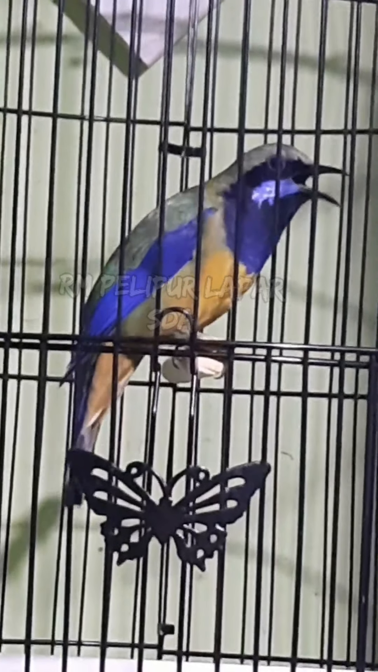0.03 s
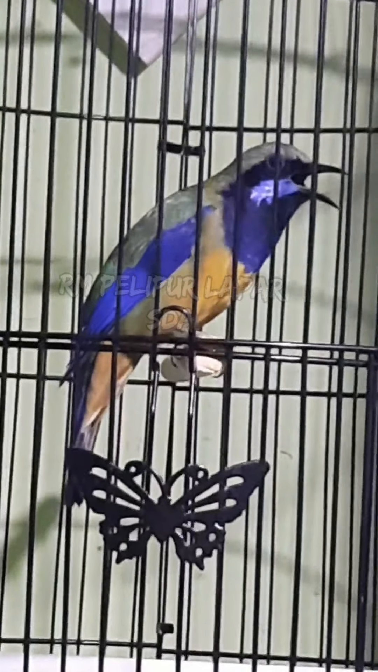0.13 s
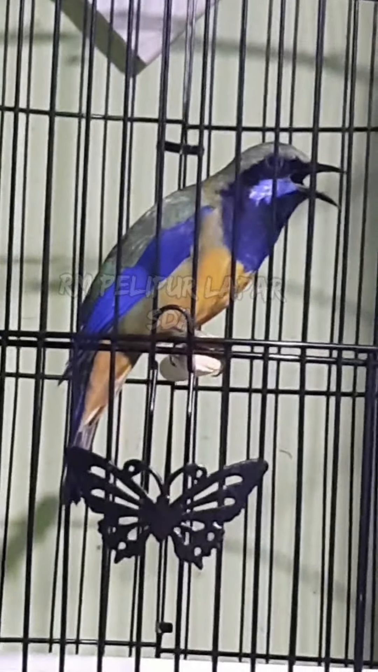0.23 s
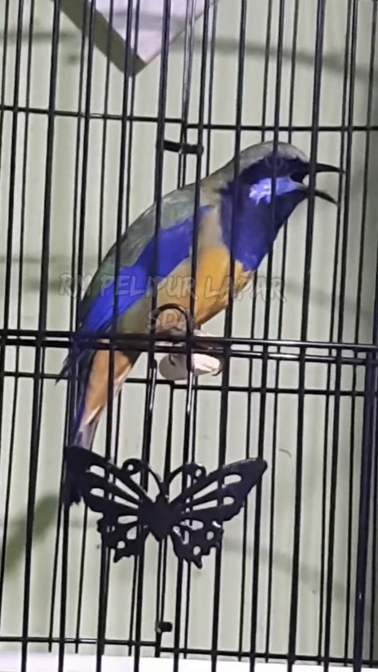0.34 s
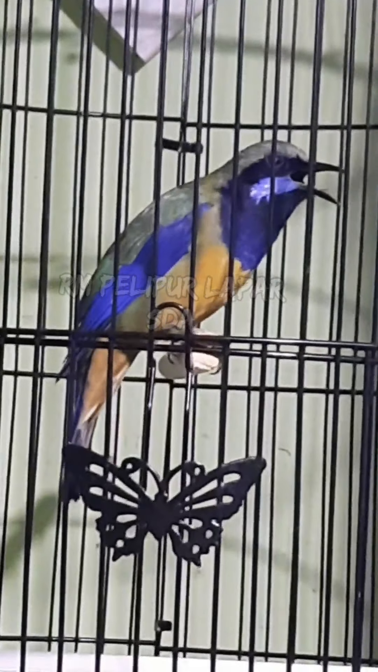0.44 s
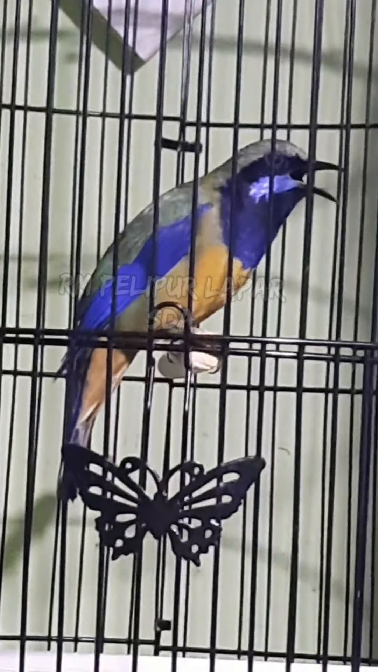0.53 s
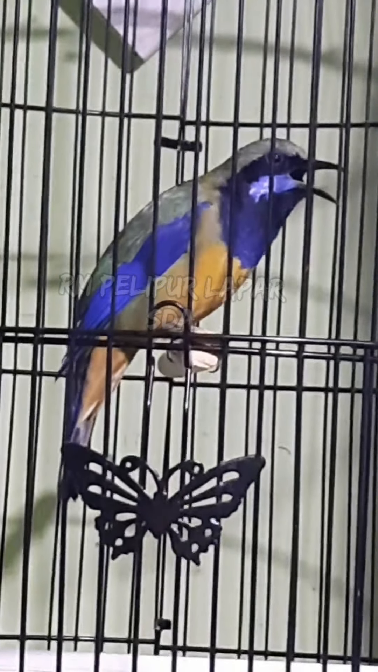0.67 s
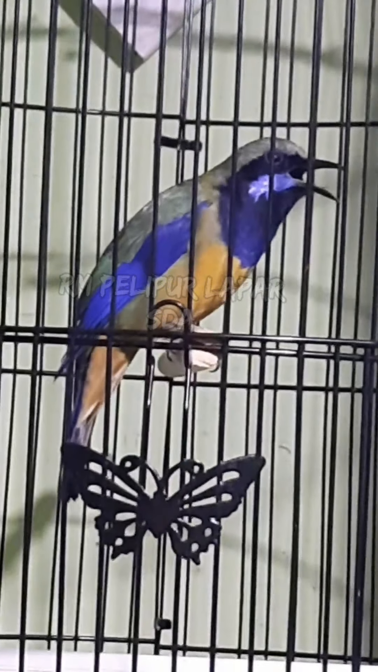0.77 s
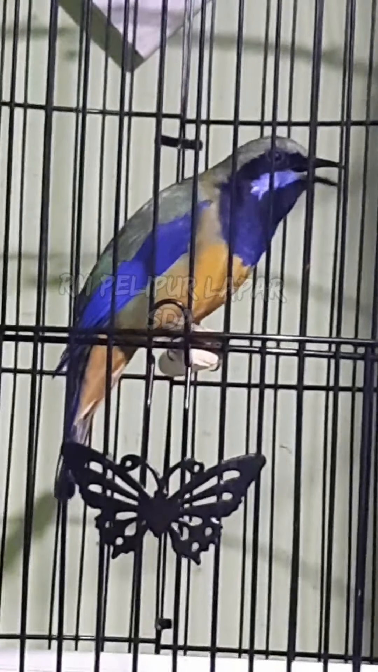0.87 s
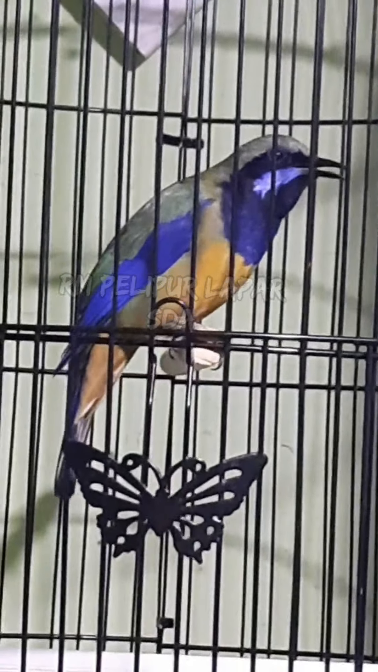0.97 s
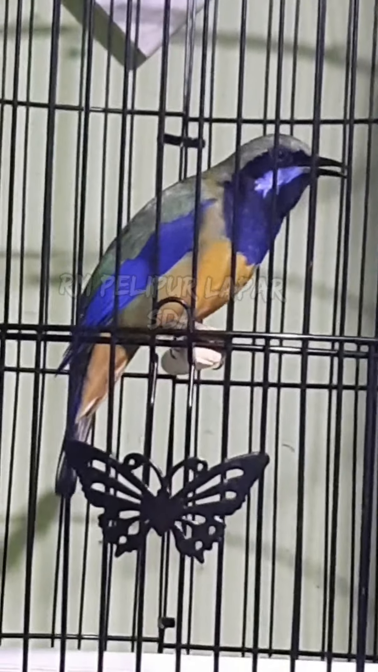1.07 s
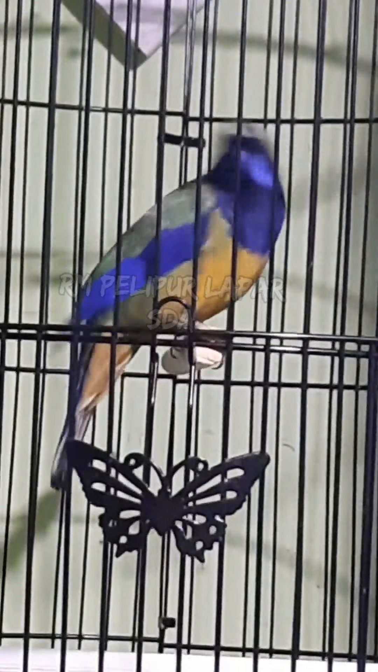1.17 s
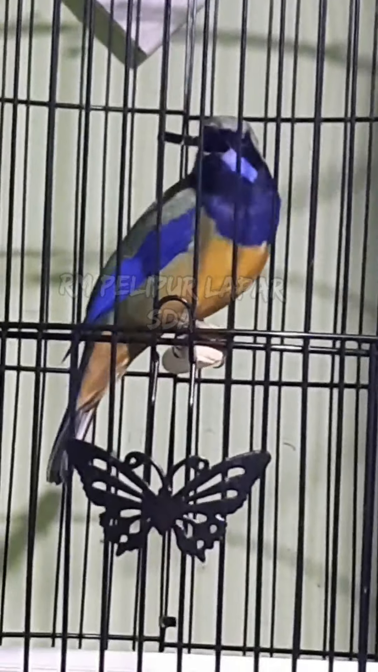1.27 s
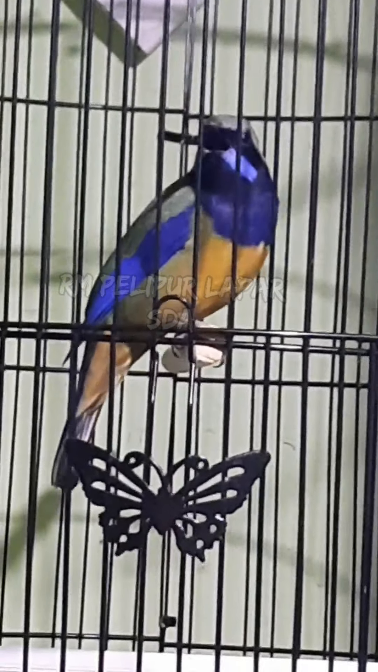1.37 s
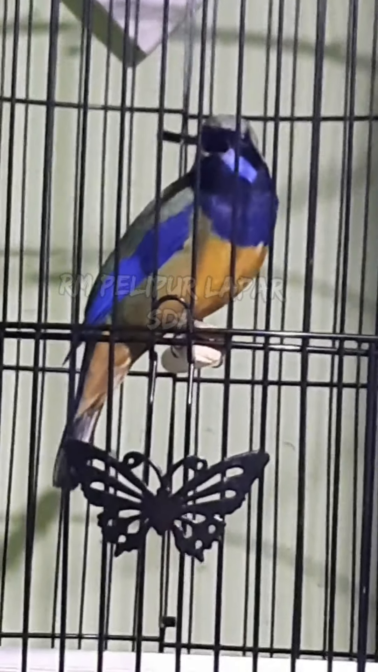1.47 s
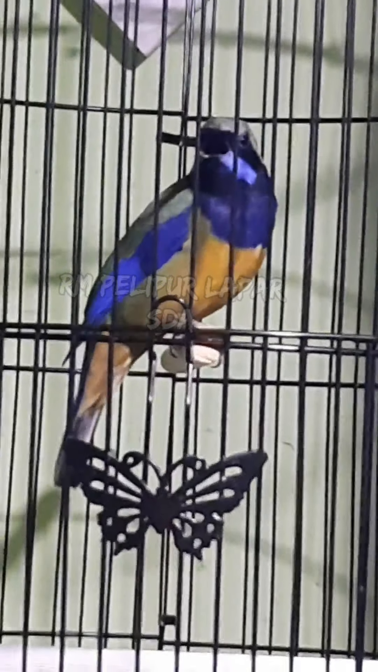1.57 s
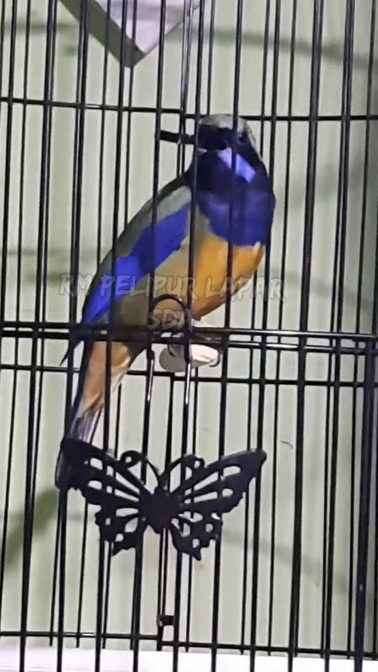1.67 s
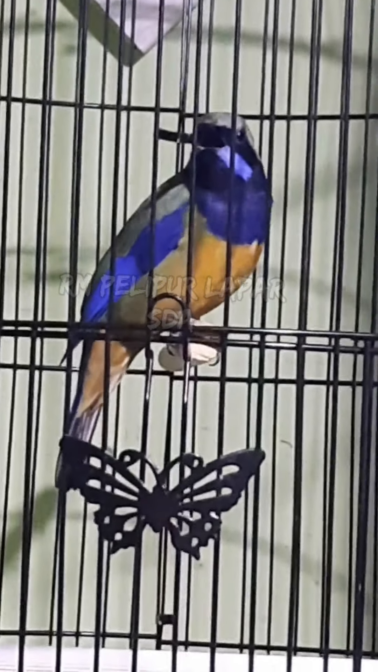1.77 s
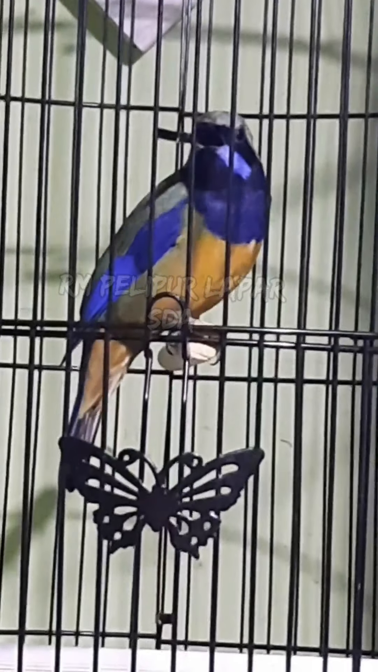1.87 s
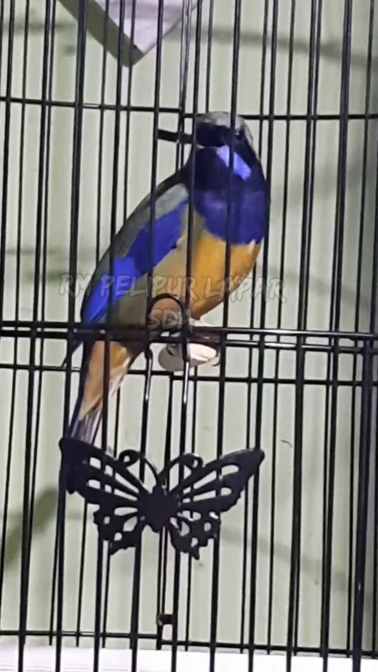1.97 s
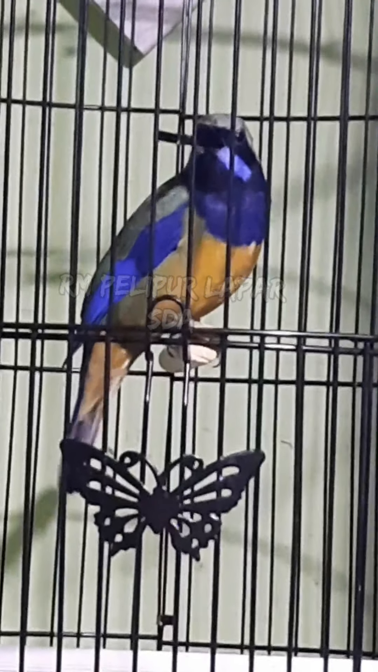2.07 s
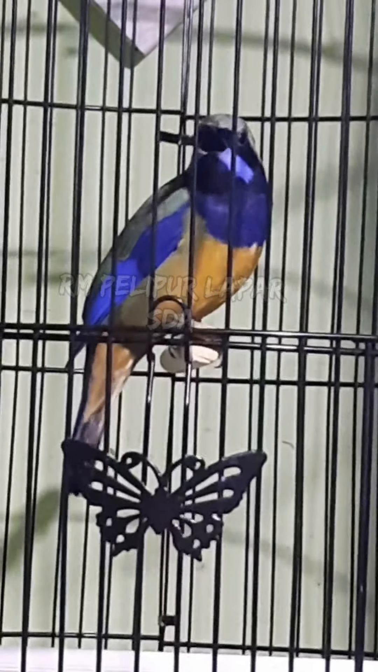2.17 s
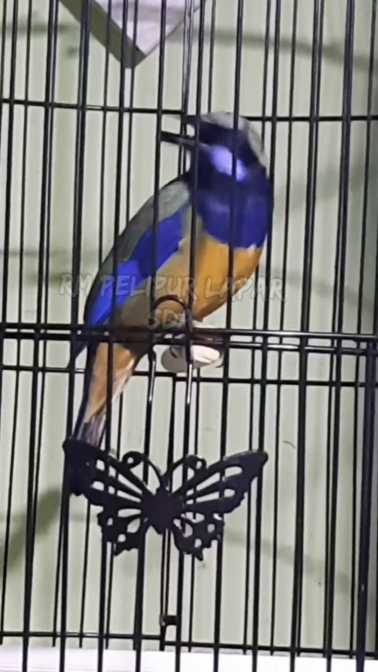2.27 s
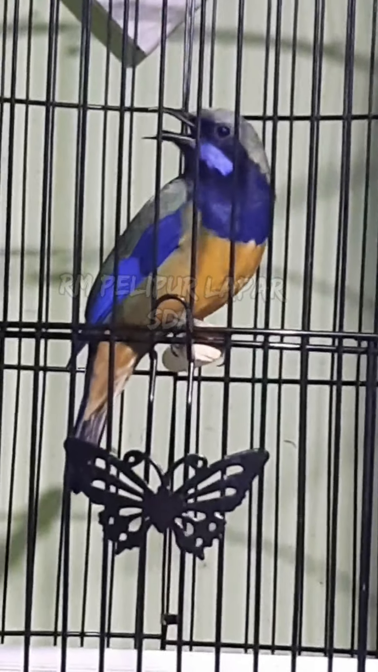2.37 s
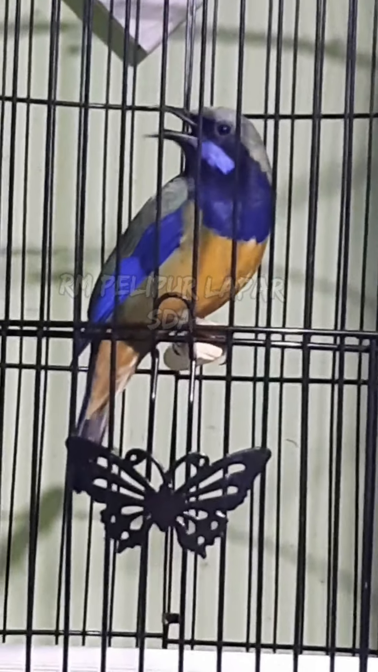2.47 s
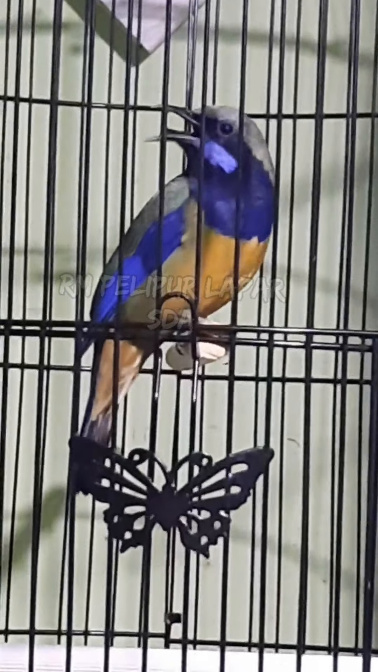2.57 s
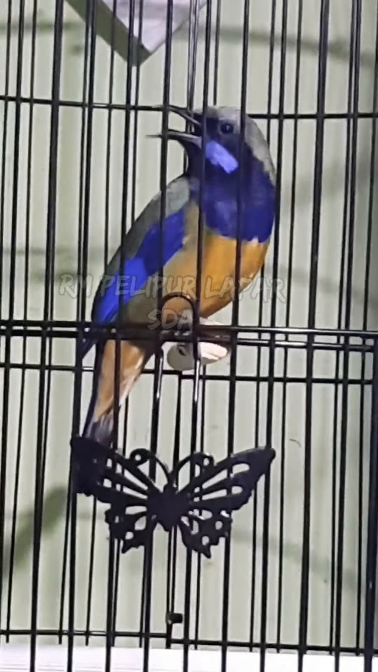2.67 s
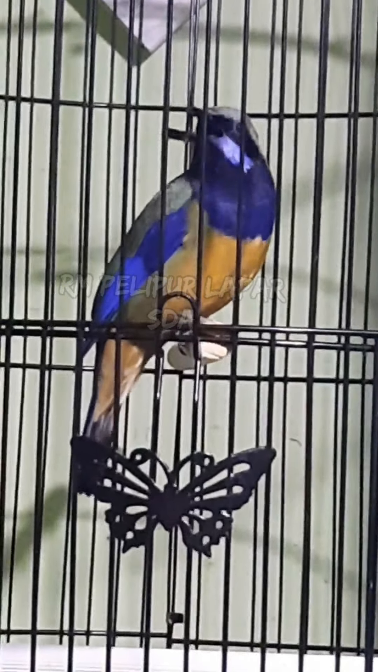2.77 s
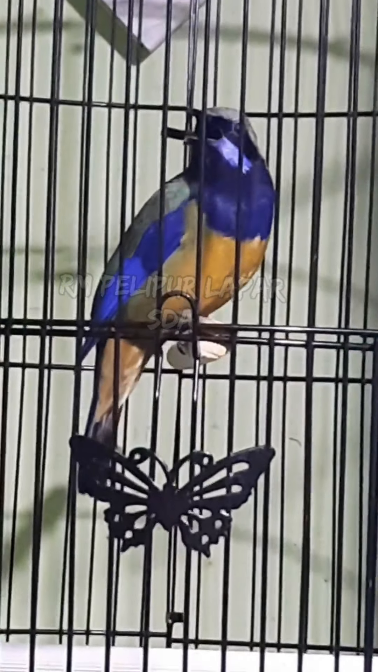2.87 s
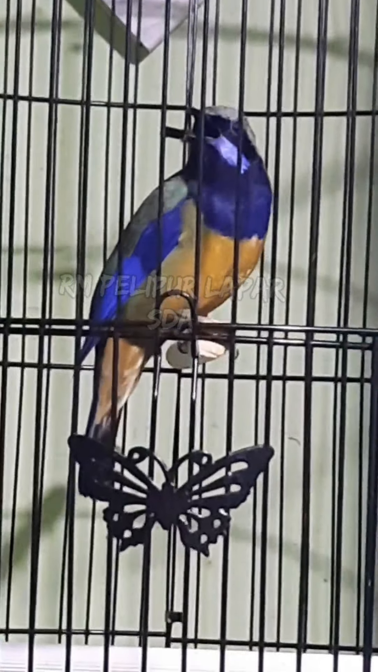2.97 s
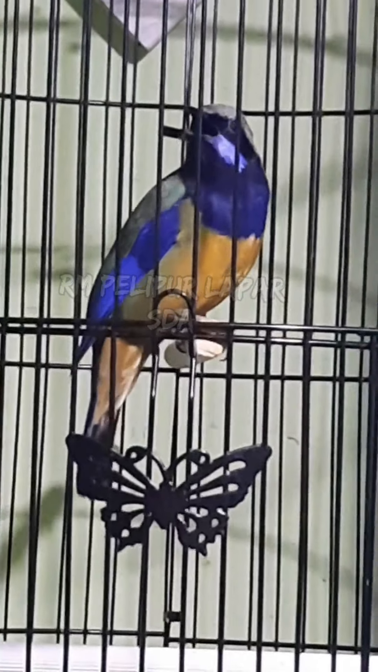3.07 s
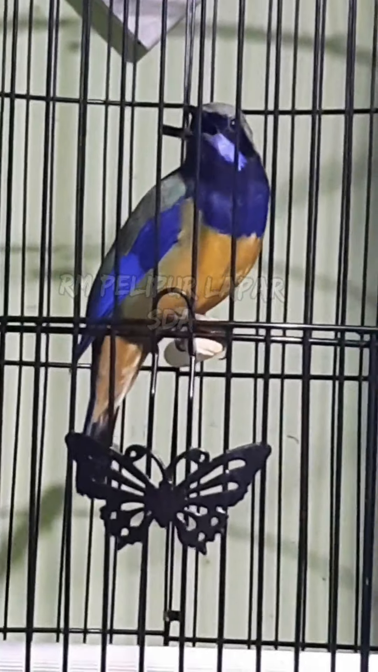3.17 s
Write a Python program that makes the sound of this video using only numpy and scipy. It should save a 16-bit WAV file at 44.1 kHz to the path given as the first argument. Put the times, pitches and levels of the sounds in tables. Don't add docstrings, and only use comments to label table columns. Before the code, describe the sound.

A caged songbird rattles off fast hard trills, then a long loud roll of down-sliding chirps, over faint street hum and hollow knocks.

```python
import sys
import numpy as np
from scipy import signal
from scipy.io import wavfile
from scipy.ndimage import map_coordinates

SR = 44100
rng = np.random.default_rng(int(sys.argv[2]) if len(sys.argv) > 2 else 0)


def put_to_file(sound):
    columns = np.atleast_2d(sound).T
    safe = np.clip(columns, -1, 1)
    whole_steps = np.round(safe * 32767)
    wavfile.write(sys.argv[1], SR, whole_steps.astype(np.int16))


def amplitude_ratio(level_db):
    exponent = np.asarray(level_db, float) / 20
    return 10 ** exponent


N = 344862


def at_hz(points, hz):
    points_hz, values = np.transpose(points)
    return np.interp(np.log(hz), np.log(points_hz), values)


def rms_one(x):
    return x / np.sqrt(np.mean(x ** 2) + 1e-20)


def drift(rate_hz, step=1):
    r = np.exp(-2 * np.pi * rate_hz * step / SR)
    slow = signal.lfilter([1], [1, -2 * r, r * r], rng.standard_normal(N // step + 2002))[2000:]
    return np.interp(np.arange(N) / step, np.arange(len(slow)), rms_one(slow))


def band(low_hz, high_hz, x):
    return signal.sosfilt(signal.butter(2, [low_hz, high_hz], "band", fs=SR, output="sos"), x)


# t/s (pitch tops out), level/dB
FIRST_ROLL = [(0.011, -20), (0.079, -18), (0.136, -15), (0.196, -17.5), (.253, -17.5), (0.312, -19.5),
              (.381, -17), (.438, -16.5), (0.5, -19), (0.557, -21.5), (0.617, -18), (0.677, -14.5),
              (0.742, -19), (0.795, -19)]
# t/s, level/dB
SECOND_ROLL = [(1.243, -13.5), (1.295, -9.5), (1.36, -12.5), (1.426, -13), (1.486, -12.5), (1.548, -14),
               (1.599, -13.5), (1.675, -14.9), (1.736, -14), (1.802, -22.5), (1.868, -14.5), (1.925, -14),
               (1.997, -16.5), (2.091, -12)]
# t/s, level/dB
LAST_ROLL = [(6.959, -19.5), (7.007, -15), (7.064, -18), (7.128, -18), (7.189, -16.5), (7.25, -17.5),
             (7.311, -17.5), (7.366, -16), (7.429, -17), (7.507, -18), (7.567, -17.5), (7.634, -17.5),
             (7.693, -18), (7.761, -19.5), (7.821, -17)]
# first f/Hz, last f/Hz, hold/s, first overtones/dB, last overtones/dB
ROLL_VOICE = [
    (4750, 4710, 0.016, -33, -47),
    (5046, 4880, 0.013, -18.5, -29),
    (4777, 4720, 0.02, -31, -39),
]


def fast_notes():
    pitch_scatter, hold_scatter, over_scatter_db = .012, .25, 2.5
    rows = []
    for roll, voice in zip((FIRST_ROLL, SECOND_ROLL, LAST_ROLL), ROLL_VOICE):
        first_hz, last_hz, hold_s, first_db, last_db = voice
        chances = rng.standard_normal((len(roll), 3))
        for along, (s, level_db), chance in zip(np.linspace(0, 1, len(roll)), roll, chances):
            top_hz = (first_hz + (last_hz - first_hz) * along) * (1 + pitch_scatter * chance[0])
            note_hold_s = hold_s * np.exp(hold_scatter * chance[1])
            over_db = first_db + (last_db - first_db) * along + over_scatter_db * chance[2]
            rows.append((s, level_db, top_hz, note_hold_s, over_db))
    return rows


# t/s (pitch tops out), level/dB, top f/Hz, end f/Hz
SLOWING = [(2.168, -7, 5330, 4680), (2.252, -9, 5400, 4980), (2.327, -12, 5700, 4750),
           (2.4, -13.5, 5890, 4430), (2.484, -9, 5720, 4880), (2.568, -9.5, 5640, 4660),
           (2.637, -6.5, 5500, 4830), (2.716, -14, 5510, 4370), (2.788, -10, 5630, 4370),
           (2.872, -11.5, 5440, 4360), (2.949, -12, 5370, 4640), (3.039, -9, 5620, 4510),
           (3.133, -10, 5570, 4570), (3.227, -10, 5480, 4630), (3.328, -9, 5480, 4530),
           (3.424, -8.5, 5640, 4630), (3.525, -8.5, 5440, 4680), (3.626, -10, 5460, 4530),
           (3.721, -10, 5620, 4590), (3.808, -10, 5510, 4710), (3.908, -9.5, 5710, 4680),
           (4.01, -9, 5380, 4390), (4.113, -9, 5450, 4670), (4.209, -8.5, 5580, 4590)]
# t/s, level/dB, top f/Hz, end f/Hz
STEADY = [(4.313, -9, 5700, 4650), (4.415, -10.5, 5670, 4790), (4.521, -9, 5520, 4580),
          (4.629, -8.5, 5450, 4460), (4.73, -9, 5550, 4570), (4.834, -7, 5300, 4725),
          (4.94, -10.5, 5580, 4490), (5.049, -8, 5350, 4660), (5.146, -8, 5450, 4650),
          (5.251, -8.5, 5540, 4720), (5.357, -9.5, 5740, 4760), (5.461, -7.5, 5630, 4820),
          (5.569, -7.5, 5660, 4770), (5.704, -7, 5640, 4765), (5.806, -11, 5740, 4750),
          (5.915, -10.5, 5600, 4670), (6.024, -8.5, 5570, 4606), (6.133, -10, 5410, 4590),
          (6.238, -10.5, 5380, 4410), (6.36, -10.5, 5370, 4510), (6.456, -9.5, 5350, 4540),
          (6.56, -10.5, 5330, 4660), (6.684, -10, 5690, 4670), (6.808, -11.5, 5710, 4770)]


def slow_notes():
    s, level_db, top_hz, end_hz = np.transpose(list(SLOWING) + list(STEADY))
    slide_s = np.minimum(.28 * np.diff(s, append=N / SR), .031)
    over_db = -10.5 + 13.5 * (top_hz - 5550) / 1000 - 0.53 * (level_db + 10)
    return list(zip(s, level_db, top_hz, end_hz, slide_s, over_db))


# f/Hz, gain/dB
THROAT = [(900, -107), (2000, 0), (3000, -0.5), (4200, 9.5), (5000, 1), (6300, 1), (7200, -19),
          (8200, -20.5), (10000, -7.5), (12000, -18), (15000, -19)]


def note(wobble, air, start_hz, top_hz, end_hz, rise_s, hold_s, over_db, bend, ease, onset_db, swell_db,
         buzz_db, thin_db, third_db, fade_s):
    t = np.arange(len(wobble)) / SR - rise_s
    climb = np.clip(1 + t / rise_s, 0, 1)
    slide = np.clip(t / hold_s, 0, 1.2)
    ragged = .035 * np.sign(1 - climb) * np.tanh(wobble / wobble.std())
    hz = start_hz + (top_hz - start_hz) * climb ** bend + (end_hz - top_hz) * slide ** 0.99
    hz = hz * (1 + wobble + ragged)
    phase = 2 * np.pi * np.cumsum(hz) / SR

    swell = amplitude_ratio(swell_db * np.sin(np.pi * np.minimum(slide, 1)))
    locked = climb ** 8
    tiring_db = -5 * slide ** 2
    breath = np.clip(climb / ease, 0, 1) ** 1.7 * amplitude_ratio(onset_db * (1 - locked) + tiring_db) * swell
    breath *= np.exp(-(np.maximum(t - hold_s, 0) / fade_s) ** 2)

    slack = np.clip((1 - climb) / 0.28, 0, 1)
    hiss = air * (.25 + slack) * (1 + np.cos(phase))
    tone = amplitude_ratio(at_hz(THROAT, hz)) * np.sin(phase) + hiss
    for k in range(2, 7):
        buzz = slack * amplitude_ratio(buzz_db + thin_db * (k - 4.5) + at_hz(THROAT, k * hz))
        edge = locked * swell * amplitude_ratio(over_db + third_db * (k - 3) - 2.0 * slide ** 2)
        below_limit = k * hz < .45 * SR
        tone += (buzz + edge) * below_limit * np.sin(k * phase)
    return breath * tone


# t/s (pitch tops out), level/dB, top f/Hz, end f/Hz, slide/s, overtones/dB
WHISTLE = [
    (1.795, -35, 5600, 5750, .045, -20),
]


def bird():
    size = SR // 12
    out = np.zeros((3, N + SR))
    wobble, flutter = drift(900), amplitude_ratio(1.2 * drift(200))
    notes = fast_notes() + slow_notes() + list(WHISTLE)
    chance = rng.standard_normal((len(notes), 4))
    poses = np.eye(3)[0] + 0.347 * chance[:, :3] * [0, 1, 1]
    for pose, push, row in zip(poses, chance[:, 3], notes):
        s, level_db, top_hz, *rest = row
        fast = len(rest) == 2
        rise_s = .021 if fast else .013
        at = int((s - rise_s) * SR)
        shake = np.resize(wobble[max(at, 0):][:size], size)
        air = np.diff(rng.standard_normal(size + 1))
        if fast:
            hold_s, over_db = rest
            rasp = amplitude_ratio(-36) * band(2200, 7200, air)
            sound = amplitude_ratio(4.5) * note(
                0.034 * shake, rasp, 1250, top_hz, .98 * top_hz, rise_s, 0.5 * hold_s, over_db - 4.0,
                bend=1.4, ease=1.0, onset_db=-.5 + push, swell_db=1.5,
                buzz_db=5, thin_db=-2.5, third_db=-7, fade_s=.003)
        else:
            end_hz, slide_s, over_db = rest
            start_hz = 2850 * (1 + 0.034 * pose[1] / 0.4)
            sound = amplitude_ratio(3.0) * note(
                shake / 350, amplitude_ratio(-35) * air, start_hz, top_hz, end_hz, rise_s, 0.79 * slide_s, over_db - 6.0,
                bend=2.1, ease=0.31, onset_db=-17 + 2 * push, swell_db=3.5,
                buzz_db=1, thin_db=-6, third_db=-1, fade_s=.004)
        out[:, max(at, 0):at + size] += amplitude_ratio(level_db) * np.outer(pose, sound[max(-at, 0):])
    return out[:, :N] * flutter


# f/Hz, t60/s
YARD_T60 = [(2000, 0.27), (5000, 0.24), (10000, 0.28), (15000, 0.022)]


def yard(poses, direct_db, wet_db, alike, lag_s):
    t = np.arange(SR // 3) / SR
    mid, side = rng.standard_normal((2, 3, len(t)))
    white = np.sqrt(alike) * mid + np.sqrt(1 - alike) * np.stack([side, side[::-1, ::-1]])
    edges_hz = 800 * 2 ** np.arange(0, 4.6, .75)
    echoes = np.zeros_like(white)
    for low, high in zip(edges_hz, edges_hz[1:]):
        echoes += band(low, high, white) * amplitude_ratio(-60 * t / at_hz(YARD_T60, low))
    near_walls = 1 + 0.5 * np.exp(-t / 0.0077)
    echoes *= np.clip((t - .002) / 0.0016, 0, 1) * near_walls
    echoes *= amplitude_ratio(wet_db) / np.sqrt(np.sum(echoes ** 2, axis=-1, keepdims=True))
    echoes[:, 0, 0] += amplitude_ratio(direct_db)
    heard = signal.fftconvolve(poses[None], echoes, axes=-1).sum(axis=1)[:, :N]
    heard[1] = map_coordinates(heard[1], [np.arange(N) - lag_s * SR], order=3)
    return heard


# t/s, level/dB
STREET = [(0.0, -41), (0.67, -35.5), (1.09, -40.5), (1.33, -36.5), (1.68, -38.5), (1.96, -37.5),
          (2.81, -38.5), (3.46, -46.5), (4.33, -47.5), (5.23, -51), (5.51, -48.5), (6.27, -51.5),
          (7.03, -45.5), (7.82, -41.5)]
# f/Hz, density/(dB per Hz)
AIR = [(25, -14), (45, -16.5), (85, 0.5), (140, -4), (200, -26), (320, -7.5), (450, -19), (800, -22),
       (1900, -24.5), (2800, -29), (6500, -47.5), (8000, -18)]
# f/Hz, correlation/1
LIKENESS = [(60, 0.97), (180, 0.91), (550, 0.52), (1650, -0.15), (4970, -0.16), (15000, 0.67)]


def street():
    near_db = np.interp(np.arange(N) / SR, *np.transpose(STREET))
    swing_db = near_db - near_db.mean()
    rumble_db = -42.5 + .6 * swing_db + 3.5 * drift(1.2, step=40)
    hum_db = -43.5 + 0.93 * swing_db
    wash_db = -47 + 0.98 * swing_db

    edges_hz = 22 * 2 ** np.arange(0, 9, .5)
    together = drift(2.5, step=40)
    white, layers = rng.standard_normal((2, 2, N)), np.zeros((3, 2, N))
    for k, (low, high) in enumerate(zip(edges_hz, edges_hz[1:])):
        mid, side = band(low, high, white[k % 2])
        hz = np.sqrt(low * high)
        alike = np.clip(at_hz(LIKENESS, hz), -1, 1)
        gain = amplitude_ratio(at_hz(AIR, hz) + 0.46 * together + 2.47 * drift(6.2, step=40))
        stereo = np.sqrt(1 + alike) * mid + np.sqrt(1 - alike) * side * [[1], [-1]]
        layers[int(hz > 200) + int(hz > 600)] += gain * stereo
    return sum(amplitude_ratio(db) * rms_one(x) for db, x in zip((rumble_db, hum_db, wash_db), layers))


# from t/s, to t/s, start f/Hz, end f/Hz, level/dB
MOTOR = [(0, 1.4, 146, 144, -43), (1.3, 4.6, 118, 116, -40), (0, 1.9, 315, 322, -44),
         (.3, 1.7, 362, 358, -47), (1.2, 4.0, 390, 385, -48), (2.2, 3.3, 312, 305, -50),
         (5.66, 5.78, 520, 515, -54), (5.87, 6.15, 275, 305, -53), (5.87, 6.3, 550, 625, -60),
         (6.27, 6.48, 335, 345, -53), (6.6, 7.82, 330, 300, -54), (7.0, 7.6, 85, 80, -41),
         (3.4, 3.9, 78, 75, -39), (0, .6, 80, 74, -40)]


def motor():
    t, out = np.arange(N) / SR, np.zeros(N)
    for start_s, end_s, start_hz, end_hz, level_db in MOTOR:
        speed = 1 + 0.01155 * drift(4.56, step=40)
        load = amplitude_ratio(1.03 * drift(4.8, step=40))
        span = slice(int(start_s * SR), int(end_s * SR))
        along = (t[span] - start_s) / (end_s - start_s)
        cycles = np.cumsum((start_hz + (end_hz - start_hz) * along) * speed[span]) / SR
        swell = np.sin(np.pi * np.clip(along, 0, 1)) ** 0.55
        out[span] += amplitude_ratio(level_db + 4.0) * load[span] * swell * np.sin(2 * np.pi * cycles)
    return out


# t/s, peak level/dB, brightness/(dB per octave), scuff/dB
KNOCKS = [(2.613, -18, 5.5, -3.5), (2.634, -27, 6, -16), (3.167, -17.5, 6, -2.5), (3.2, -28, 4, -24),
          (3.851, -22, 1.5, -4), (4.834, -24.5, -9.5, -1.5), (4.855, -22.5, 2.5, -4.5),
          (4.938, -38.5, 10, 2), (5.316, -27.5, 9, 0), (5.39, -27, 9, -1.5), (5.464, -34.5, -13, 15.5),
          (5.519, -48, 3, -16)]
# f/Hz, level/dB, t60/s
BOX = [
    (106, -13, 0.16),
    (285, -10, 0.081),
    (377.5, 7.5, 0.059),
    (611, -1, 0.06),
    (737, -0.5, 0.024),
    (1107, -20.5, 0.058),
    (1506, -23.5, 0.12),
]


def knocks():
    t, out = np.arange(SR // 4) / SR, np.zeros((2, N))
    rattles = rng.standard_normal((len(KNOCKS), 2, len(t)))
    strengths_db = rng.normal(0, 2, (len(KNOCKS), len(BOX)))
    for (s, peak_db, bright_db, scuff_db), rattle, strength_db in zip(KNOCKS, rattles, strengths_db):
        force = rattle[0] * np.exp(-t / 0.036)
        body = np.zeros(len(t))
        for (hz, mode_db, t60_s), own_db in zip(BOX, strength_db):
            r, w = amplitude_ratio(-60 / (t60_s * SR)), 2 * np.pi * hz / SR
            gain = amplitude_ratio(mode_db + own_db + bright_db * np.log2(hz / 400))
            body += gain * signal.lfilter([0, np.sin(w)], [1, -2 * r * np.cos(w), r * r], force)
        scuff = band(300, 2600, rattle * np.exp(-t / 0.048))
        at = int(s * SR)
        out[:, at:at + len(t)] += amplitude_ratio(peak_db) * (body / np.abs(body).max() + amplitude_ratio(scuff_db) * scuff)
    return out


def scene():
    song = yard(bird(), direct_db=-8.5, wet_db=-1.5, alike=0.062, lag_s=.00006)
    treble = signal.sosfilt(signal.butter(2, 7000, "high", fs=SR, output="sos"), song)
    song = song * amplitude_ratio([[.1], [-.1]]) + .24 * treble * [[1], [-1]]
    return song + (knocks() + motor() + street()) * amplitude_ratio([[.7], [-.7]])


def roll_off(x):
    return signal.sosfilt(signal.butter(12, 16290, fs=SR, output="sos"), x)


def record(dry):
    hissing = dry + amplitude_ratio(-60) * rng.standard_normal(dry.shape)
    pressed = hissing / (1 + np.abs(hissing / .88) ** 8) ** (1 / 8)
    mix = signal.sosfilt(signal.cheby2(12, 70, 16500, fs=SR, output="sos"), pressed)
    return roll_off(mix)


dry = scene()
out = record(dry)
put_to_file(out)
```